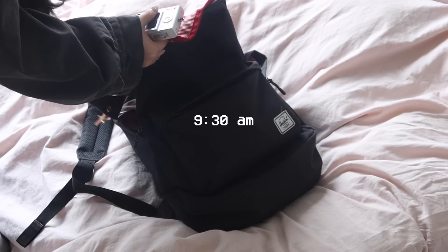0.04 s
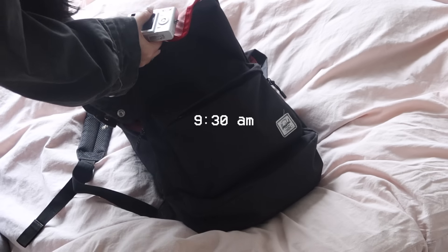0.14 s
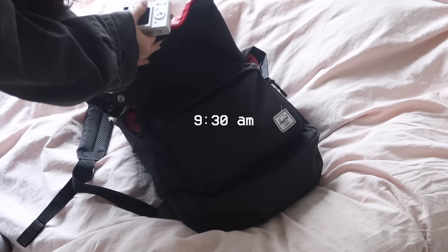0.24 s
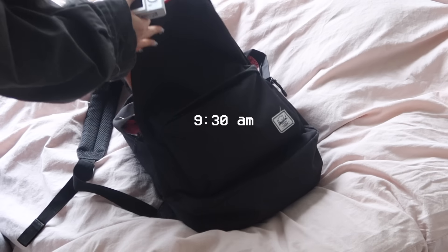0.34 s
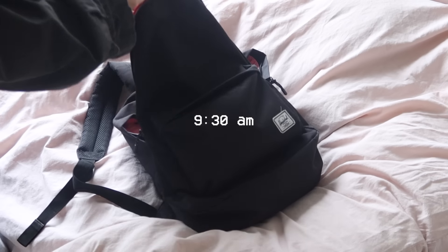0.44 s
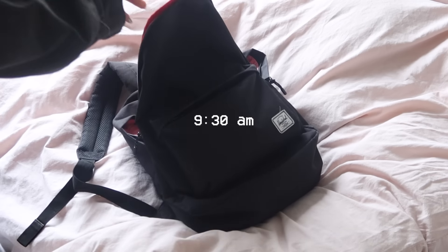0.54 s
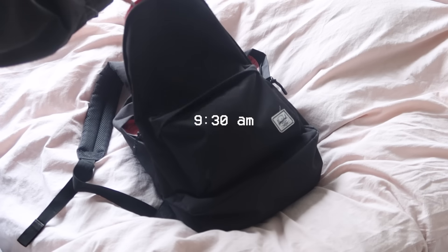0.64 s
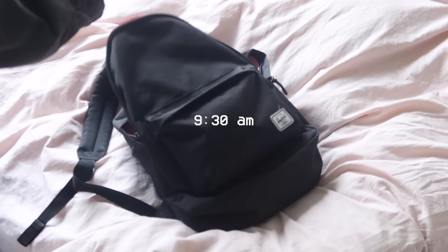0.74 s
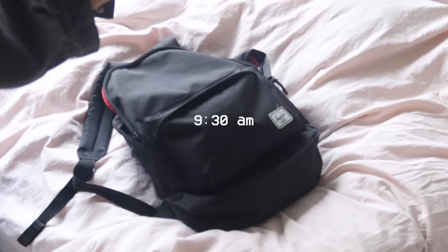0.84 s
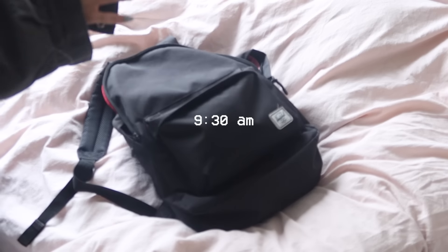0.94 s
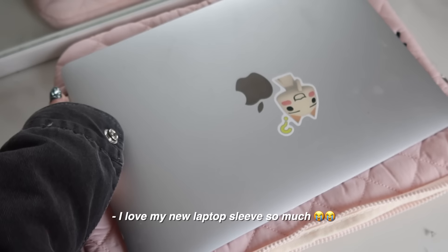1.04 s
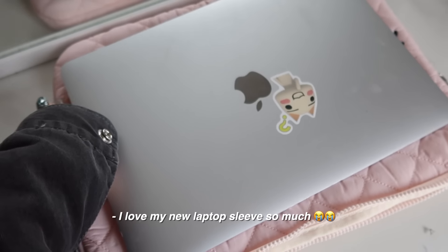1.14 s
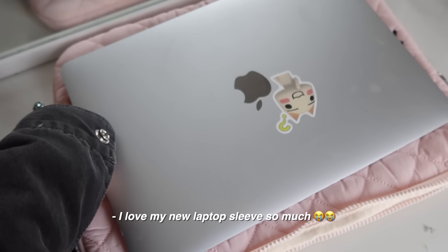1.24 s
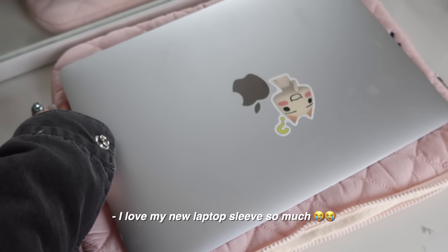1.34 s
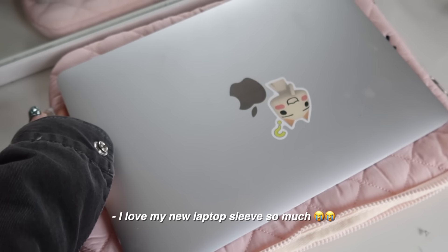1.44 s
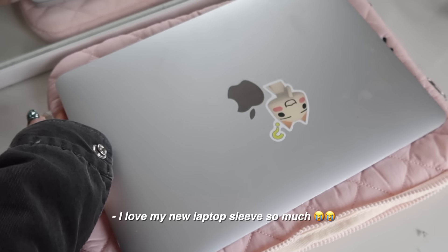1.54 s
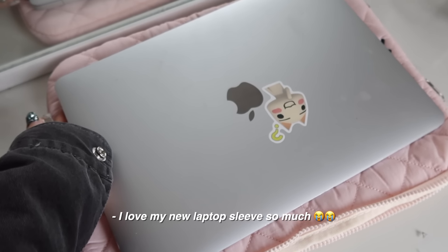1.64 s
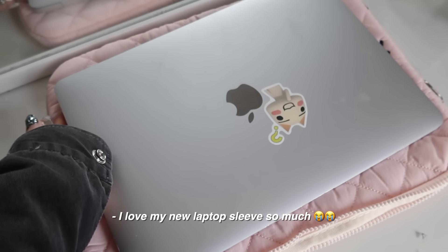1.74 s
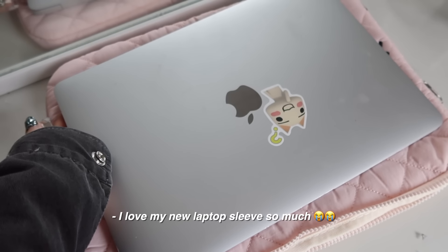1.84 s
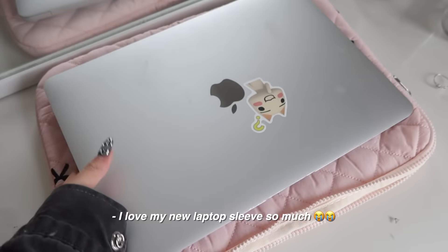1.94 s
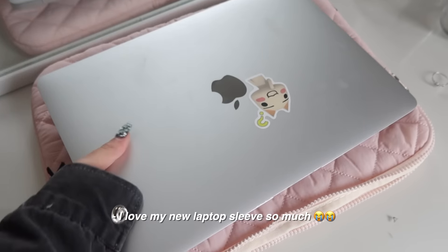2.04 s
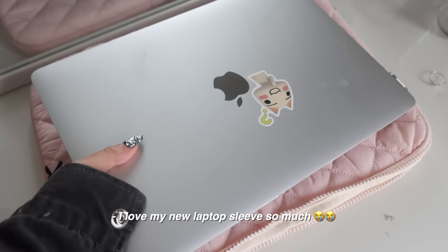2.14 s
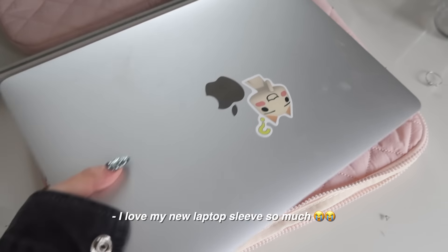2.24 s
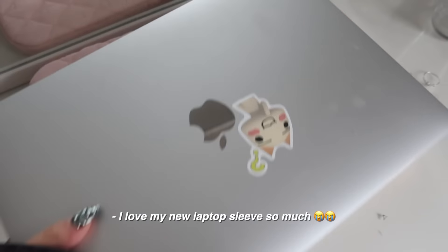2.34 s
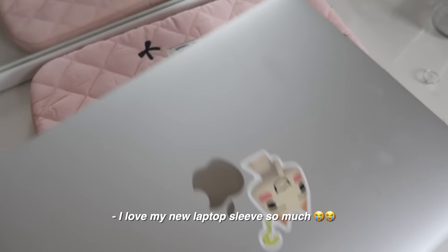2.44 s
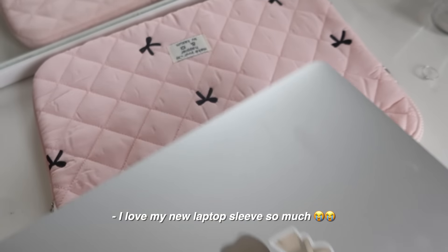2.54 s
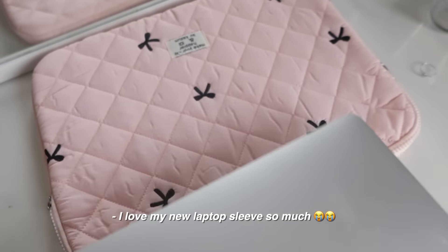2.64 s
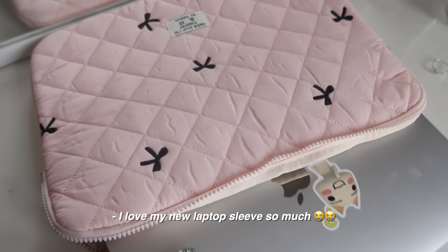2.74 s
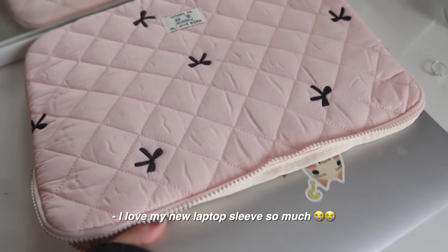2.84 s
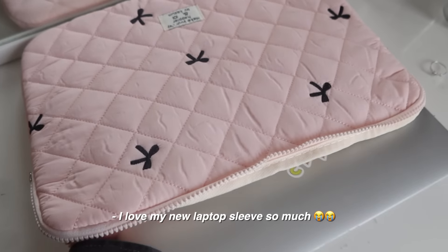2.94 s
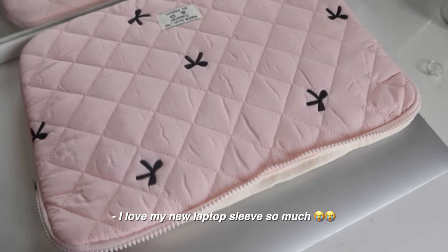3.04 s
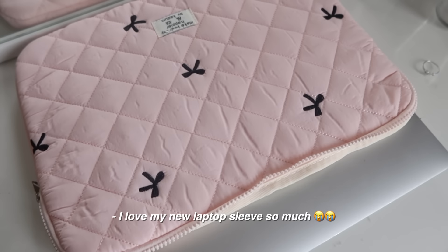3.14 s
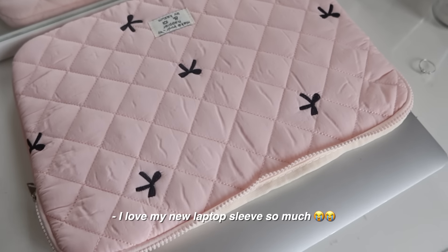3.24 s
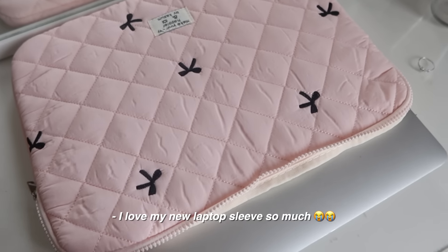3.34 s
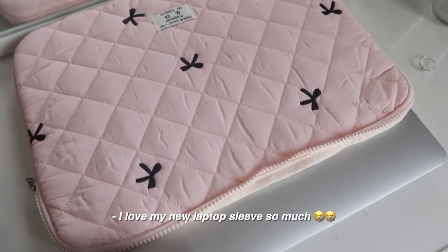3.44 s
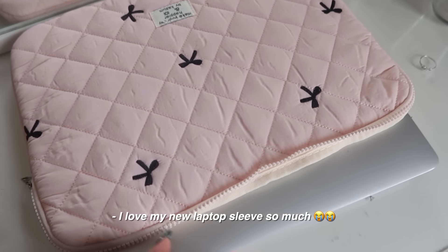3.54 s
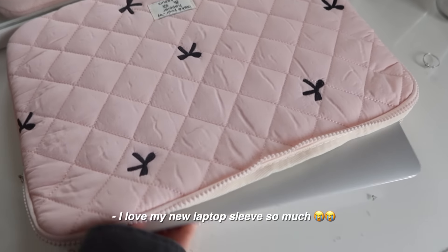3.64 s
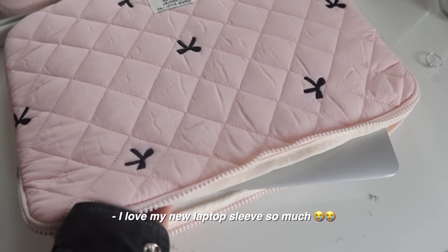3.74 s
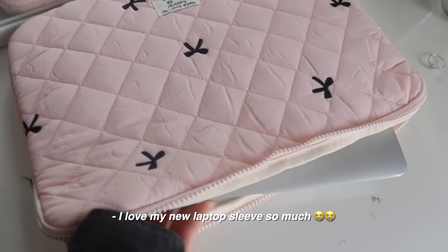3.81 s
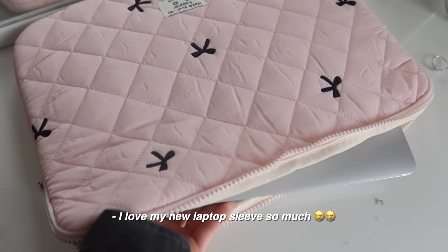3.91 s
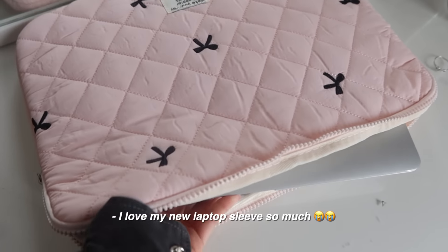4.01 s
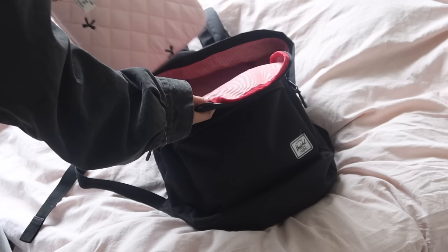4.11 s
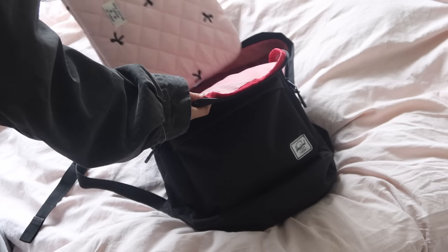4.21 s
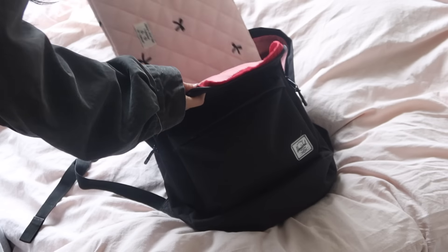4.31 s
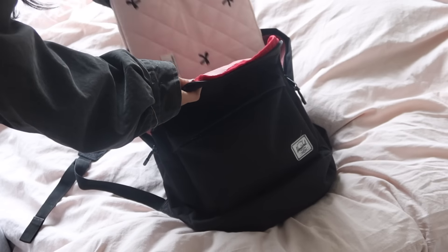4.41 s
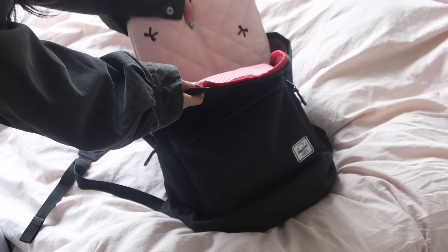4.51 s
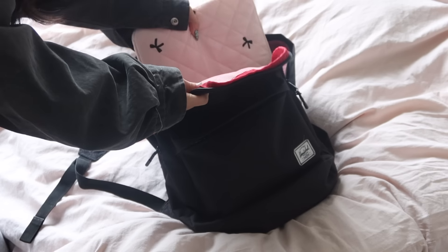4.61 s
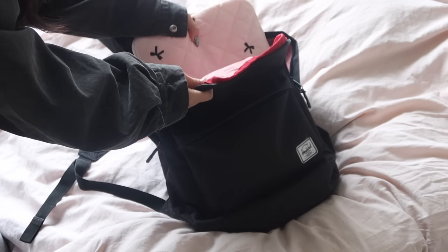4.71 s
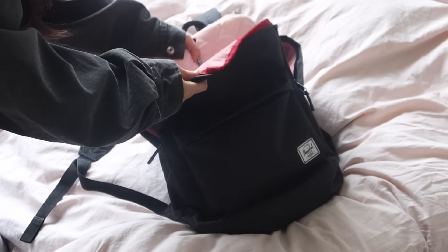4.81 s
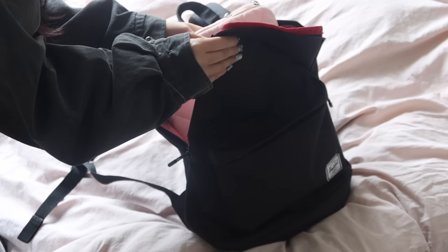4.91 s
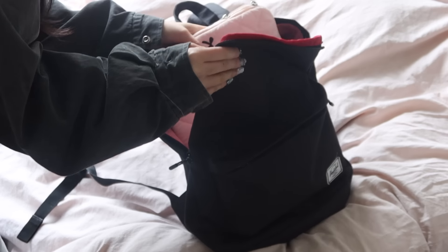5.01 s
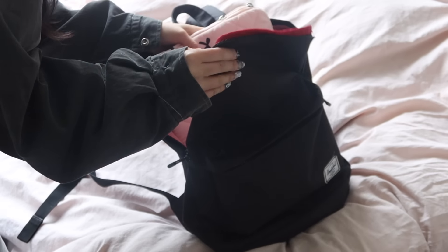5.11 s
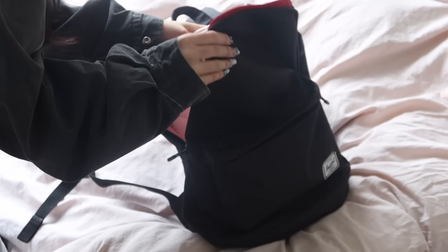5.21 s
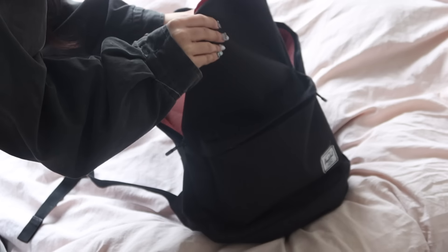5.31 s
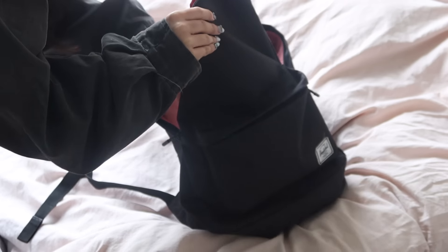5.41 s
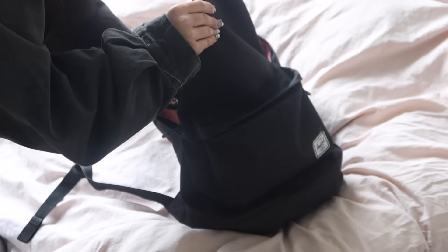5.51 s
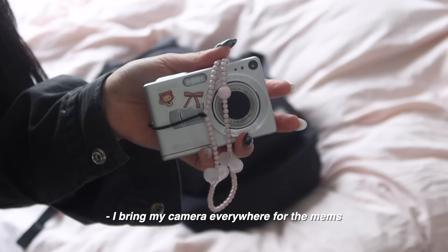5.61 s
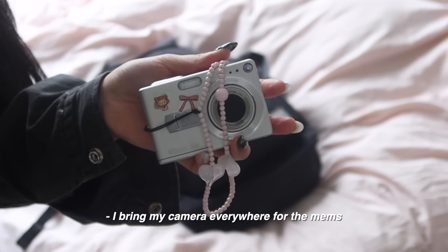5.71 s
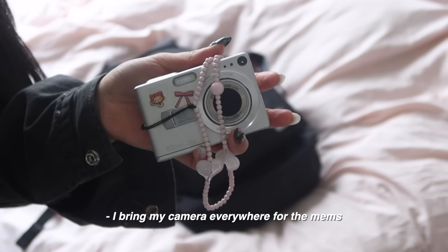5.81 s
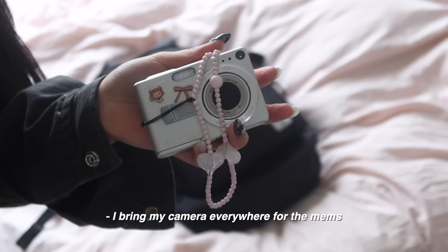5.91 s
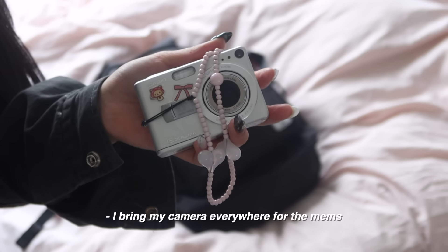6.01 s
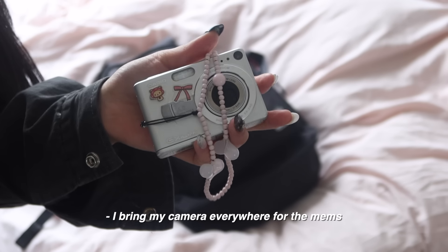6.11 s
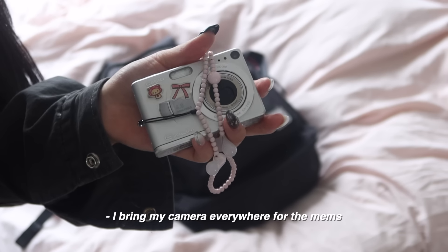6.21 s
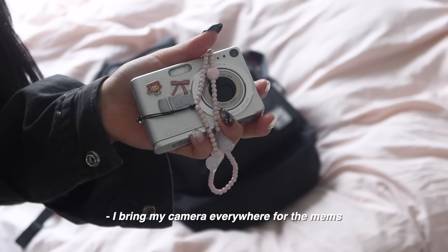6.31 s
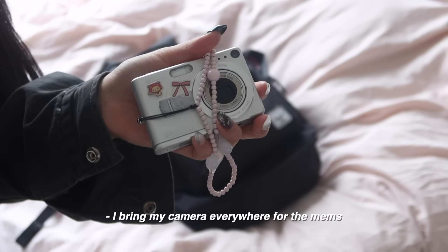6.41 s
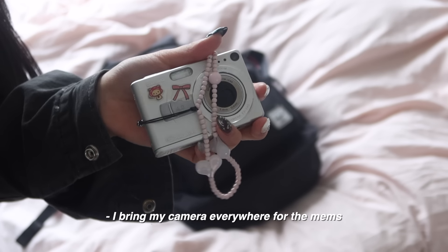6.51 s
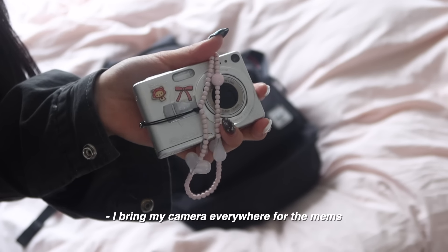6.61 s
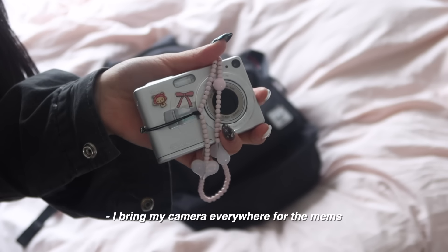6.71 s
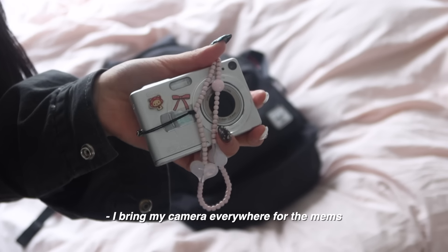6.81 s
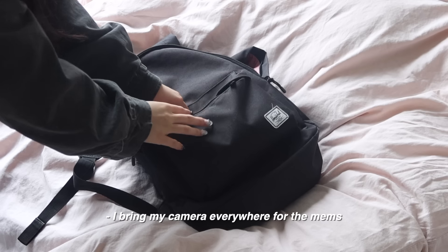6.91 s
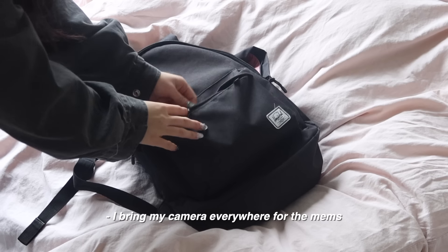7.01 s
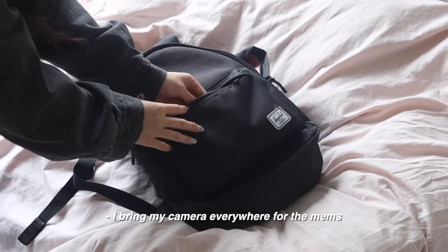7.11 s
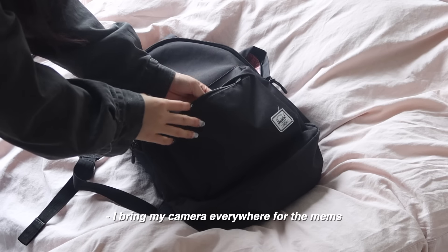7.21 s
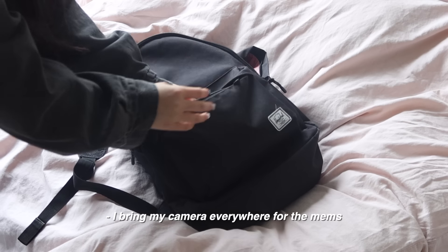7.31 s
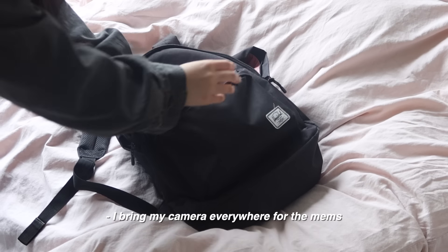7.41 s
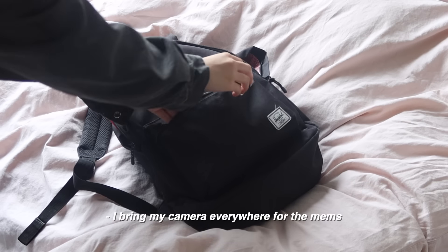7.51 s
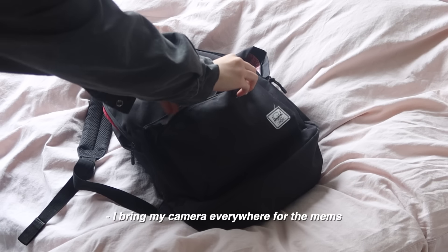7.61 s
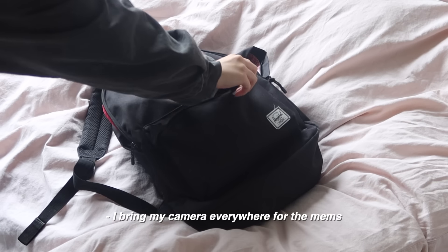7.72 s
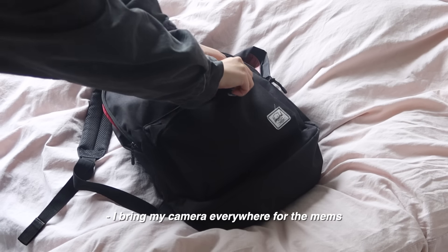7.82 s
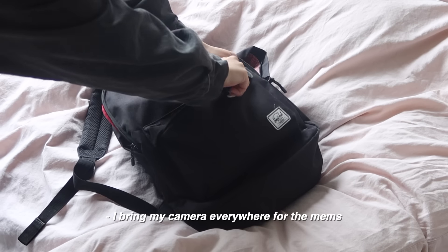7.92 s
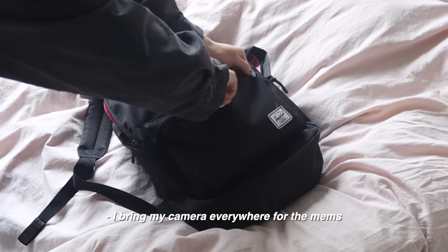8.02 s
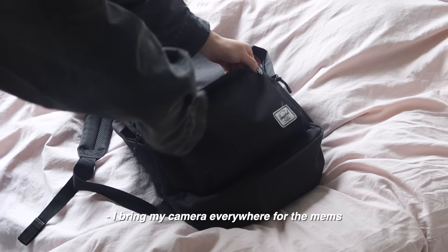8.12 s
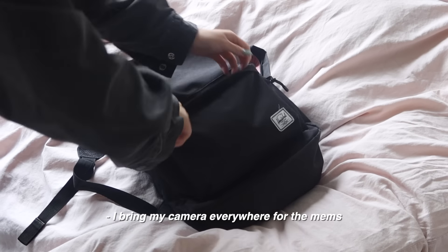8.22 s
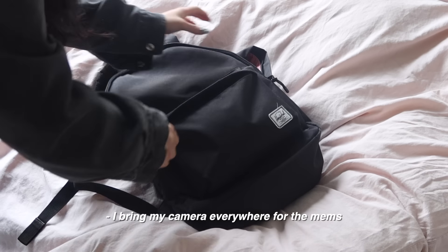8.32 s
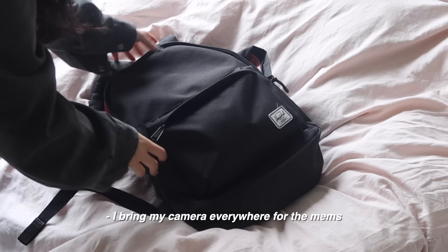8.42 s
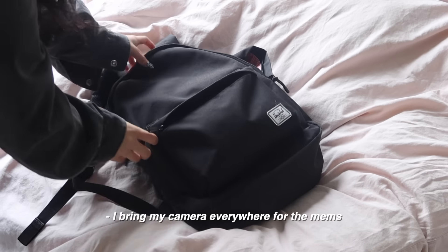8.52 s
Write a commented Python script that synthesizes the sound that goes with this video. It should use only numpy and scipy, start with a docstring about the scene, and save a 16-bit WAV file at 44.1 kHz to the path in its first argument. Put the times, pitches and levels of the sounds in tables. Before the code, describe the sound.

Close, quiet bedroom packing: fabric rustle, soft thuds, plastic clicks, sharp metal-lid knocks, a faint tab jingle, ticking beads, then a quick zip.

```python
"""Cloth rubs and soft thuds come first, then plastic snaps: a backpack is packed on a bed.
A laptop with a metal lid clacks into a padded sleeve on a desk; a pull tab jingles, beads tick, a zip shuts.
Cloth is grainy shaped noise, hits are filtered clicks and noise bursts, the tab is a sum of decaying modes,
and the zip is tooth clicks ringing in the slider. Two close microphone ports hear it all with echoes
in a quiet room of air noise and hum, with a rumble at the desk."""
import sys
import numpy as np
from scipy import signal
from scipy.fft import rfft, irfft, next_fast_len
from scipy.io import wavfile
from scipy.ndimage import uniform_filter1d

SR = 44100
rng = np.random.default_rng(int(sys.argv[2]) if len(sys.argv) > 2 else 0)


def dump_mix(stems):
    """Bounce the given channels to the path in sys.argv[1] as a 16-bit WAV at rate SR."""
    frames = np.atleast_2d(stems).T  # one column per channel
    limited = np.clip(frames, -1, 1)  # hard clip at full scale
    pcm = np.round(limited * 32767).astype(np.int16)
    wavfile.write(sys.argv[1], SR, pcm)


N = 377044


def gain_of(db):
    """Decibels to amplitude gain."""
    return 10 ** (np.asarray(db) / 20)


def evened(x):
    """Scales to rms 1."""
    return x / np.sqrt(np.mean(x ** 2) + 1e-20)


def peaked(x, db):
    """Sets the peak level."""
    return gain_of(db) * x / abs(x).max()


def read(points, hz):
    """Interpolates a spectrum on a log-frequency axis."""
    f, value = np.transpose(points)
    return np.interp(np.log(hz + 1), np.log(f + 1), value)


def coloured(x, gain):
    """Filters by gain(Hz) over the whole length."""
    size = next_fast_len(x.shape[-1] + 4096)
    hz = np.fft.rfftfreq(size, 1 / SR)
    return irfft(rfft(x, size) * gain(hz), size)[..., :x.shape[-1]]


def shaped(x, points):
    """Filters by a tabulated dB spectrum."""
    return coloured(x, lambda hz: gain_of(read(points, hz)))


def band(x, hz, width_hz):
    """Two-pole resonance of peak gain 1."""
    b, a = signal.iirpeak(min(hz, SR * .45), hz / width_hz, SR)
    return signal.lfilter(b, a, x)


def add(mix, t_s, sound):
    """Adds a sound at a time, cut at the end of the mix."""
    part = mix[round(t_s * SR):][:len(sound)]
    part += sound[:len(part)]


# air noise spectrum: f/Hz, relative level/dB per Hz
AIR_SPECTRUM = [(12, -30), (20, 6), (70, -1), (123, 0.5), (187, -5), (255, -5), (472, -10.5), (624, -13.5),
                (949, -13), (1220, -15), (3740, -20.5), (7110, -27), (13200, -39.5), (14700, -42),
                (16000, -54)]
# desk rumble spectrum: f/Hz, relative level/dB per Hz
RUMBLE_SPECTRUM = [(8.8, -30), (15, -7), (38, 8), (70, 7.5), (91, -27), (123, 11.5), (174, -40), (250, -9),
                   (320, -55), (550, -120)]
# time at the desk: from t/s, to t/s
AT_DESK_S = (1.043, 4.155)
AIR_DB, RUMBLE_DB, HUM_DB = -51, -51.5, -61.5  # rms
HUM_HZ, HUM_HALF_WIDTH_HZ = 119.6, 11.0


def room():
    """Mid and side of steady air noise, wavering mains hum (narrow noise) and rumble at the desk."""
    t = np.arange(N) / SR
    air, rumble, waver = rng.standard_normal((3, 2, N))
    air = gain_of(AIR_DB) * evened(shaped(air, AIR_SPECTRUM))
    rumble = gain_of(RUMBLE_DB) * evened(shaped(rumble, RUMBLE_SPECTRUM))
    hum = coloured(waver, lambda hz: 1 / (1 + ((hz - HUM_HZ) / HUM_HALF_WIDTH_HZ) ** 2))
    at_desk = (t > AT_DESK_S[0]) & (t < AT_DESK_S[1])
    return air + gain_of(HUM_DB) * evened(hum) + rumble * at_desk


# echo decay: f/Hz, t60/s
ECHO_T60 = [(100, 0.56), (500, 0.28), (2000, 0.18), (6000, 0.2), (14000, 0.12)]


def echo(size=14000):
    """Mid and side noise tails, each band dying at its own speed; the mid has unit energy."""
    hz, t, z = signal.stft(rng.standard_normal((2, size)), SR, nperseg=128)
    decay = gain_of(-60 * t / read(ECHO_T60, hz)[:, None])
    tail = signal.istft(z * decay, SR, nperseg=128)[1][:, :size]
    onset_s = 0.0051  # first reflections come from bed and desk
    tail = tail * np.clip(np.arange(size) / SR / onset_s, 0, 1)
    return tail / np.linalg.norm(tail[0])


def grainy(grain_db, per_s):
    """Mid and side noise whose level jumps as fibres catch and let go."""
    sizes = gain_of(grain_db * np.minimum(rng.exponential(1, N), 4))
    catches = sizes * (rng.random(N) < per_s / SR)
    decay_s = 0.0018
    level = 1 + signal.lfilter([1], [1, -np.exp(-1 / (decay_s * SR))], catches)
    return rng.standard_normal((2, N)) * level


# rub spectrum at brightness 1: f/Hz, relative level/dB per Hz
RUB_SPECTRUM = [(350, -30), (600, -4.5), (953, 4.5), (1370, 4), (1630, 3.5), (1770, 5), (2980, 2.5),
                (4590, -7), (7000, -20), (9100, -33), (15400, -120)]


def rubbing(s, brightness):
    """Grainy noise whose spectrum slides up and down with the stroke, with drifting patches."""
    hz, t, z = signal.stft(grainy(0.39, 80), SR, nperseg=512, noverlap=384)
    patches = uniform_filter1d(rng.standard_normal(z.shape[1:]), 4, 0)
    patches = evened(uniform_filter1d(patches, 10, 1))
    stretch = np.clip(np.interp(t, s, brightness), .4, 2.5)
    shape = gain_of(read(RUB_SPECTRUM, hz[:, None] / stretch))
    shape /= np.sqrt(np.mean(shape ** 2, axis=0))
    z = z * shape * gain_of(2.2 * patches)
    return signal.istft(z, SR, nperseg=512, noverlap=384)[1][:, :N]


SWING_DB = 20  # climb over one rise time, fall over one release time; the slopes run on beyond


def effort(t, full, rise, hold, release):
    """Level in dB of one movement: it climbs, holds at 0 and sinks."""
    before = (full - t) / max(rise, .002)
    after = (t - full - hold) / max(release, .002)
    return -SWING_DB * np.maximum(np.maximum(before, after), 0)


# bag boom spectrum: f/Hz, relative level/dB per Hz
BOOM_SPECTRUM = [(41, -39), (70, -11), (107, -8.5), (146, -11), (183, 0.5), (258, -4), (312, 1), (900, -11),
                 (1170, -81), (1980, -120)]
# nylon sheen spectrum: f/Hz, relative level/dB per Hz
SHEEN_SPECTRUM = [(2650, -1), (4500, -2), (5280, -2.5), (6630, -2), (10200, -6.5), (12600, -6.5),
                  (13700, -9), (16000, -25)]
# hands on cloth, a row per grip or slide: full from t/s, rise/s, hold/s, release/s,
# rub level/dB, bag boom level/dB, nylon sheen level/dB, rub brightness (factor on frequency)
HANDLING = [(.0, .01, 0.13, .05, -50, -59, -64, 0.88), (0.112, 0.095, 0.055, 0.24, -40.5, -38, -56.5, 0.85),
            (0.198, .05, 0.036, 0.24, -42.5, -50, -60, 0.84),
            (0.31, 0.073, 0.014, 0.19, -45, -44, -55.5, 1.16),
            (0.397, 0.088, 0.085, 0.15, -42, -48, -68, 0.9),
            (0.487, 0.16, 0.13, 0.26, -45, -51.5, -51.5, 1.2),
            (0.691, 0.019, 0.016, 0.065, -54, -72, -53, 0.92),
            (0.85, .1, 0.083, 0.077, -44, -56, -65, 1.15), (.97, .03, 0.096, .03, -52, -73, -64, 1.2),
            (1.047, .005, 0.048, 0.059, -45.5, -54, -57, 0.89),
            (1.17, .015, 0.0038, 0.082, -47.5, -41, -52, 0.94),
            (1.947, 0.0044, 0.25, 0.17, -48, -48.5, -58.5, 0.92),
            (2.335, 0.076, 0.38, 0.11, -56.5, -56, -68, 0.74),
            (2.788, .03, 0.045, 0.14, -50, -56, -65, 1.6), (2.924, 0.22, .01, 0.033, -48, -50.5, -57, 0.78),
            (2.94, .03, 0.22, .1, -51, -51.5, -60, 1.05), (3.134, 0.062, 0.037, .05, -40, -36.5, -43, 0.76),
            (3.194, .02, 0.035, 0.098, -40, -41.5, -52, 0.77), (3.322, .02, 0.15, .1, -58, -49.5, -61, 1.1),
            (3.541, 0.16, 0.0087, 0.058, -42.5, -54, -60, 0.78),
            (3.59, .03, 0.18, .05, -51, -65, -61, 1.04),
            (3.643, 0.033, 0.023, 0.093, -48, -39.5, -65, 0.86),
            (3.781, 0.036, .01, 0.062, -42.5, -35.5, -49.5, 0.84),
            (3.815, 0.028, 0.036, 0.13, -43, -40.5, -58, 0.78),
            (3.92, 0.056, 0.092, 0.19, -47.5, -51.5, -57, .9),
            (4.146, 0.18, 0.26, .1, -53, -57.5, -66.5, 1.09),
            (4.405, 0.096, 0.022, 0.34, -49, -53, -62, 1.0),
            (4.539, .12, 0.04, 0.92, -42, -43, -57.5, 0.86),
            (4.714, 0.17, 0.16, 0.1, -49.5, -49.5, -68, 0.7),
            (4.861, 0.073, .012, .07, -43, -42, -71, 0.58), (4.966, 0.015, 0.013, 0.082, -58, -44, -63, 1),
            (5.0, .05, 0.36, .05, -62.5, -68, -73, 0.88), (5.337, 0.082, .015, 0.071, -43, -47, -52, 1.07),
            (5.382, .05, 0.14, .05, -55, -55.5, -62, 1),
            (5.534, 0.069, 0.046, .01, -48, -46.5, -58.5, 1.08),
            (6.14, 0.073, .01, 0.085, -54, -69, -57.5, 1.1),
            (6.885, 0.0045, 0.029, .05, -46.5, -43, -63, 0.82),
            (6.946, 0.036, .005, 0.053, -40.5, -47, -50, 0.69),
            (6.991, .03, 0.12, 0.12, -47.5, -46.5, -62, 1),
            (7.093, .03, 0.014, 0.047, -41.5, -48, -52, 0.84), (7.134, .02, .03, .1, -40.5, -48, -50, 0.92),
            (7.214, .04, 0.027, 0.057, -40, -45.5, -50, 0.81),
            (7.249, 0.037, 0.024, 0.067, -39, -45, -49, 1.05),
            (7.3, .01, .015, 0.12, -39.5, -46, -58, 1.02), (7.357, .02, 0.016, .08, -39.5, -52, -52, 0.76),
            (7.393, .05, 0.26, 0.067, -50, -52.5, -66.5, 0.98),
            (7.797, 0.19, 0.033, 0.092, -38.5, -34, -51, .75),
            (7.873, 0.027, .07, 0.23, -52.5, -47.5, -63, 1.3), (7.99, .1, 0.16, .05, -44, -38, -62, 0.59),
            (8.18, 0.027, .01, 0.074, -31.5, -33.5, -56, 0.82),
            (8.227, 0.032, 0.064, 0.17, -40.5, -44, -57, .8),
            (8.483, 0.06, .07, .05, -41, -42.5, -57, 0.72)]


def cloth():
    """Rubbing, boom and sheen follow the hands; overlapping movements add their power."""
    t = np.arange(0, N + 64, 64) / SR
    *timing, rub_db, boom_db, sheen_db, brightness = np.transpose(HANDLING)
    efforts = np.array([effort(t, *row) for row in np.transpose(timing)])
    rub, boom, sheen = (gain_of(efforts + db[:, None]) ** 2 + 1e-12 for db in (rub_db, boom_db, sheen_db))
    mean_brightness = brightness @ rub / rub.sum(0)  # weighted by power
    layers = ((rub, rubbing(t, mean_brightness)),
              (boom, shaped(grainy(3.3, 25), BOOM_SPECTRUM)),
              (sheen, shaped(grainy(1.0, 100), SHEEN_SPECTRUM)))
    total = np.zeros((2, N))
    for power, noise in layers:
        level = np.interp(np.arange(N) / SR, t, np.sqrt(power.sum(0)))
        total += level * evened(noise)
    return total


# soft heavy things land: t/s, peak level/dB, f/Hz, t60 of the puff/s
THUDS = [(0.05, -36, 294, 0.093), (0.119, -37, 374, 0.098), (0.209, -33, 301, 0.052),
         (0.33, -31.5, 416, 0.13), (0.843, -34.5, 284, 0.05), (0.89, -30.5, 425, 0.036),
         (1.044, -36, 56.5, 0.13), (1.161, -39, 86.1, 0.047), (3.1085, -28.5, 450, 0.046),
         (3.13, -26, 523, 0.06), (3.145, -27, 82, 0.12), (3.165, -46, 72, 0.047), (3.199, -28, 51.1, 0.071),
         (3.624, -28, 300, 0.11), (3.774, -36, 315, 0.22), (3.8208, -16.5, 930, 0.043),
         (3.8273, -23, 454, 0.041), (3.821, -24, 160, 0.11), (3.842, -25.5, 108, 0.1),
         (3.878, -31.5, 50, 0.07), (3.939, -31.5, 298, 0.13), (4.521, -34, 192, 0.33),
         (4.955, -36.5, 247, 0.25), (5.094, -38, 320, 0.061), (5.111, -38, 303, 0.062),
         (5.535, -36, 307, 0.11), (5.569, -39, 350, 0.071), (6.888, -31, 576, 0.12),
         (8.484, -27.5, 348, 0.088), (8.4845, -30, 790, 0.034)]


def thuds(mix):
    """A damped push at the pitch of the padding, with a slower puff of noise around it."""
    t = np.arange(9000) / SR
    for (s, db, hz, t60), chance in zip(THUDS, rng.standard_normal((len(THUDS), 9000))):
        puff = evened(band(band(chance, hz, 0.3 * hz), hz, 5.2 * hz)) * gain_of(-60 * t / t60)
        push = np.sin(2 * np.pi * hz * t) * gain_of(-60 * t / (.5 * t60))
        onset = np.clip(t * hz * 4, 0, 1)  # a quarter cycle
        add(mix, s, peaked((push + .5 * puff) * onset, db))


# beads tick against each other: t/s, peak level/dB, centre f/Hz
BEADS = [(5.3285, -32.5, 8400), (5.652, -48, 7400), (5.704, -45, 6580), (6.1154, -37, 9520),
         (6.124, -40, 9470), (6.1494, -38, 11880), (6.1888, -47, 6200), (6.532, -40.5, 6930),
         (6.8059, -42, 6770), (6.935, -30.5, 9000), (6.96, -37, 6030), (7.003, -42, 6770),
         (7.038, -41, 7920), (7.0572, -29, 10100)]


def beads(mix):
    """Tiny bright ticks: band-passed noise dying in about a millisecond."""
    for (s, db, hz), chance in zip(BEADS, rng.standard_normal((len(BEADS), 400))):
        tick = chance * np.exp(-np.arange(400) / SR / 0.001)
        add(mix, s, peaked(band(band(tick, hz, 1.0 * hz), hz, 1.87 * hz), db))


# shakes of the pull tab: t/s, level/dB
JINGLES = [(3.78, -59), (3.84, -57), (3.88, -59), (3.971, -52), (5.335, -49), (5.357, -52), (5.389, -58),
           (5.415, -60), (5.445, -59), (5.476, -60)]
# modes of the tab: f/Hz, relative level/dB, t60/s
TAB_MODES = [(3850, -1, .22), (6500, -13, .1), (8550, -1, .09), (10200, 0, .09), (14250, -6, .15)]


def jingles(mix):
    """The small metal tab rings in a few high modes, fluttering as it rattles in its loop."""
    t = np.arange(12000) / SR
    for s, db in JINGLES:
        strength, detune = rng.standard_normal((2, len(TAB_MODES)))
        flutter = uniform_filter1d(rng.standard_normal((len(TAB_MODES), len(t))), 300)
        flutter = evened(uniform_filter1d(flutter, 200))
        ring = np.zeros(len(t))
        for (hz, mode_db, t60), a, b, f in zip(TAB_MODES, strength, detune, flutter):
            level_db = db + mode_db + 1.1 * a + 5.1 * f - 60 * t / t60
            ring += gain_of(level_db) * np.sin(2 * np.pi * hz * (1 + 0.0046 * b) * t)
        add(mix, s, np.clip(t / 0.0034, 0, 1) * ring)


# slider resonances: f/Hz, width/Hz, relative level/dB
SLIDER = [(495, 213, 8.5), (1050, 350, 3), (1550, 340, 6), (2470, 640, -2), (3300, 860, -7.5),
          (4720, 3400, -22.5), (11500, 4100, -33)]
CRUISE_HZ = 500  # teeth per second; faster runs smoother


def stroke(rows, stutter):
    """Each tooth clicks through the slider with a puff of rasp; uneven pulling shifts and weights clicks."""
    s, speed, db = np.transpose(rows)
    t = np.arange(s[0], s[-1], 1 / SR)
    hz, level_db = np.interp(t, s, speed), np.interp(t, s, db)
    uneven = stutter * np.minimum(CRUISE_HZ / hz, 1) ** 2
    wobble = evened(uniform_filter1d(rng.standard_normal(len(t)), size=160))
    pull = np.maximum(1 + np.clip(uneven, 0, 1) * wobble, .1)
    turns = np.cumsum(hz * pull) / SR  # teeth passed
    weights = 1 + 2.5 * uneven * rng.standard_normal(len(t))
    teeth = np.diff(np.floor(turns), prepend=0) * weights
    puffs = rng.standard_normal(len(t)) * np.exp(-(turns % 1) / 0.32)
    rasp = band(puffs, 3000, 3500)
    drive = evened(teeth / np.sqrt(hz)) + .3 * evened(rasp)
    rung = np.zeros(len(t))
    for k, (f, width, mode_db) in enumerate(SLIDER):
        mode = band(band(drive, f, 1.17 * width), f, 1.2 * width)
        rung += (-1) ** k * gain_of(mode_db) * mode
    return s[0], gain_of(level_db) * evened(rung) * signal.windows.tukey(len(t), .2)


# zip strokes, one table each: t/s, teeth rate/Hz, level/dB
STROKES = [
    [(7.72, 304, -61), (7.77, 450.4, -49), (7.815, 628, -42), (7.89, 280, -61)],
    [(7.94, 190.8, -67), (8.0, 286.2, -43.5), (8.04, 391.3, -31), (8.075, 515, -23.5), (8.105, 695, -24.5),
     (8.124, 808, -23), (8.136, 823, -22.5), (8.15, 789, -21.5), (8.168, 633, -18.5), (8.178, 570, -44),
     (8.2, 430, -42)],
    [(8.25, 400.6, -52), (8.29, 647.6, -30.5), (8.35, 403, -58)],
]
# unevenness of each stroke up to the cruise speed (0-1)
STUTTER = [.17, .075, .2]


def zipper(mix):
    """The pocket zip shuts in successive strokes."""
    for rows, stutter in zip(STROKES, STUTTER):
        add(mix, *stroke(rows, stutter))


# plastic things snap together in the bag: t/s, body peak level/dB, centre f/Hz, edge peak re body/dB
SNAPS = [(0.5256, -14.5, 1830, -0.5), (0.5299, -14, 1990, 1), (.536, -12, 3580, -30),
         (.571, -17, 2900, -29), (.576, -16.5, 1790, -12), (0.584, -22, 2070, -22), (0.741, -21, 3250, 3),
         (.747, -22, 3026, 3), (0.7595, -10.5, 2100, -5.5), (.798, -15, 2030, -11),
         (.8105, -7.5, 2290, -7.5), (0.8159, -6, 2340, -18), (.823, -18, 2230, -29), (.846, -26, 2240, -25),
         (.91, -15.5, 2400, -6), (4.864, -26, 1700, -30), (4.905, -39, 2300, -30), (4.958, -33, 800, -25),
         (5.328, -30, 1080, -14), (5.343, -28.5, 1800, -3), (5.634, -38.5, 1680, -22),
         (5.708, -36, 1930, -20), (7.023, -28.5, 1500, -20), (7.141, -22, 1890, -26),
         (7.153, -26, 1760, -26), (7.223, -28, 3300, -8), (7.234, -14.5, 2070, -10.5),
         (7.252, -20, 2000, -18), (7.295, -19.5, 2400, -26), (7.365, -19.5, 1880, -29),
         (7.38, -21, 1700, -22), (7.4375, -24.5, 2380, -18), (7.454, -20.5, 1860, -29),
         (7.471, -30, 3140, -12), (8.295, -32, 2350, -34), (8.449, -34, 2010, -30), (8.474, -28, 2470, -28),
         (8.532, -32, 3010, -26)]
SNAP_TAIL_DB = -2.5  # echo send re direct


def snaps(near, sent):
    """A sharp click rings for two or three cycles, with a thin bright edge."""
    click = np.zeros(600)
    click[0] = 1
    for (s, db, hz, edge_db), chance in zip(SNAPS, rng.standard_normal((len(SNAPS), 600))):
        blow = click + 0.16 * chance * np.exp(-np.arange(600) / SR / 0.0013)
        body = band(band(band(blow, 1.03 * hz, 1.22 * hz), 1.01 * hz, 0.82 * hz), hz, 2.5 * hz)
        edge = band(band(blow, 7600, 6000), 10400, 8000)
        sound = peaked(body, db) + peaked(edge, db + edge_db)
        add(near, s, sound)
        add(sent[rng.integers(len(sent))], s, gain_of(SNAP_TAIL_DB) * sound)


# fingernail and hard edge on the metal lid: t/s, peak level/dB, length/ms, dullness/dB per octave,
# echo send re direct/dB
CLACKS = [(1.1664, -35.5, 4.5, 10, 8), (1.9453, -36, 6.4, 8.5, -4), (2.5988, -33.5, 9, -2, -8),
          (2.892, -26, 1.6, 10, -1), (2.9218, -30.5, 4.6, -1, -5.5), (3.1068, -9.5, 9.7, 1, -9),
          (3.1284, -4.5, 6.1, 3, -8), (3.1378, -12.5, 2.8, -9, -13), (3.1568, -33, 3.5, -2, -9),
          (3.215, -15, 9.2, 4.5, -11.5), (3.2246, -22, 1.6, 5.5, -23), (3.2674, -35, 3.5, 2.5, -3),
          (3.3208, -33, 6.2, 2.5, -13), (3.344, -33.5, 9.3, -0.5, -14), (3.3843, -34.5, 9.3, 6.5, -23),
          (3.4247, -32, 7.1, 8.5, -5), (3.5698, -36, 4, 2.5, -1), (3.6207, -13, 5.2, 2, -7),
          (3.6451, -20, 4.6, 6.5, -18), (3.6783, -35, 3.5, 4, -3), (3.7773, -29.5, 2, 1, -2),
          (3.9379, -13.5, 5.1, 2, -9), (3.9464, -32, 4.8, -5, -6), (3.9567, -21, 8.5, 1.5, -7),
          (3.9692, -28.5, 6.6, 2, -5), (3.9817, -28, 5.9, 1, -14)]
# modes of the lid: f/Hz, relative level/dB
LID_MODES = [(1450, -28.5), (2740, -42), (4370, -10), (5140, 4.5), (6480, 3), (8470, -6), (10470, -24)]
LID_T60_S = .007  # the hand and the padding stop every mode alike


def clacks(near, sent):
    """A few milliseconds of chatter, heard directly and through the modes of the lid."""
    t = np.arange(3000) / SR
    ring = sum(gain_of(db - 60 * t / LID_T60_S) * np.sin(2 * np.pi * hz * t) for hz, db in LID_MODES)
    for (s, db, ms, dull_db, tail_db), chance in zip(CLACKS, rng.standard_normal((len(CLACKS), 600))):
        u = t[:600] * 1000 / max(ms, .2)
        chatter = chance * np.tanh(6 * u) * np.exp(-1.5 * u ** 2)
        sound = signal.fftconvolve(chatter, .04 * ring)
        sound[:600] += chatter

        def tone(hz):
            """Dullness tilt between a low cut and a high cut."""
            tilt = gain_of(-dull_db * np.log2(hz / 3000 + 0.066))
            return tilt * hz ** 2 / (hz ** 2 + 900 ** 2) / (1 + (hz / 10000) ** 8)

        sound = peaked(coloured(sound, tone), db)
        add(near, s, sound)
        add(sent[rng.integers(len(sent))], s, gain_of(tail_db) * sound)


# direct sound: f/Hz, side re mid level/dB
LEAD = [(60, -46), (300, -31), (1500, -29), (4000, -9), (8000, -1), (14000, 1)]
# room noise: f/Hz, side re mid level/dB
DIFFUSE = [(60, -31), (150, -5), (380, 3.5), (950, 0), (2380, -2.5), (5980, -4), (15000, -6)]
# cloth and echoes: f/Hz, side re mid level/dB
NEARBY = [(60, -31), (150, -34), (380, -20), (950, -22.5), (2380, -17.5), (5980, -2), (15000, 3)]
REST_TAIL_DB = -10.0  # echo send of thuds, beads, jingles and zip


def scene():
    """Direct sound reaches one port a little early; diffuse sound differs between them."""
    near, rest = np.zeros((2, N))
    sends = np.zeros((3, N))  # three echo tails; each snap or clack takes one at random
    thuds(rest)
    beads(rest)
    jingles(rest)
    zipper(rest)
    snaps(near, sends)
    clacks(near, sends)
    sends[0] += gain_of(REST_TAIL_DB) * rest
    tails = sum(signal.oaconvolve(sent[None], echo(), axes=1)[:, :N] for sent in sends)
    around, air, direct = tails + cloth(), room(), near + rest
    side = shaped(around[1], NEARBY) + shaped(air[1], DIFFUSE)
    # a lead in time is a quarter-turn side signal
    side += coloured(direct, lambda hz: 1j * gain_of(read(LEAD, hz)))
    mid = around[0] + air[0] + direct
    return np.array([mid + side, mid - side])


EDGE_HZ = 15600


def record(dry):
    """Low-passes both ports at the band limit."""
    taps = signal.firwin(511, EDGE_HZ, window=("kaiser", 9), fs=SR)
    return signal.oaconvolve(dry, taps[None], "same")


dry = scene()
out = record(dry)
dump_mix(out)
```